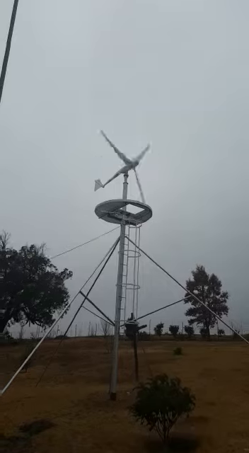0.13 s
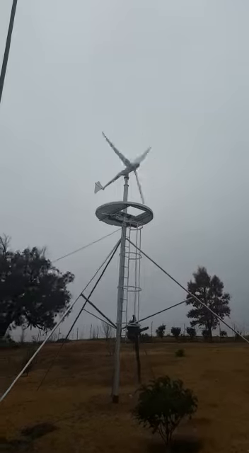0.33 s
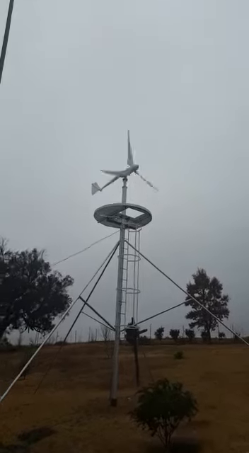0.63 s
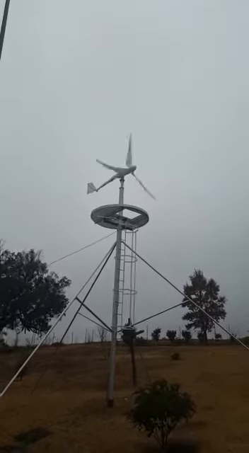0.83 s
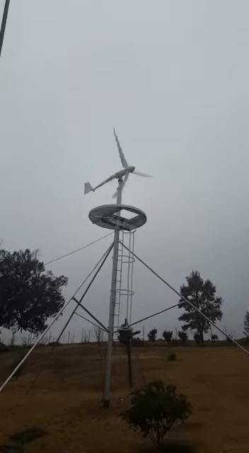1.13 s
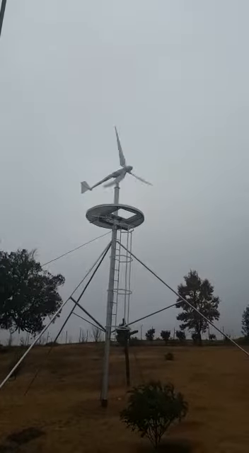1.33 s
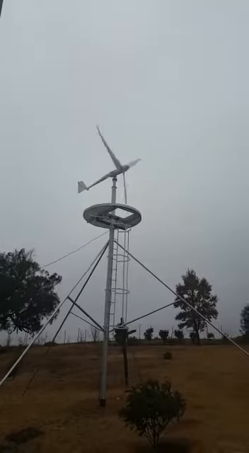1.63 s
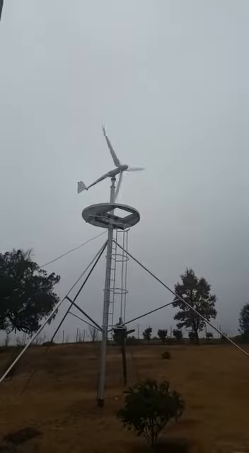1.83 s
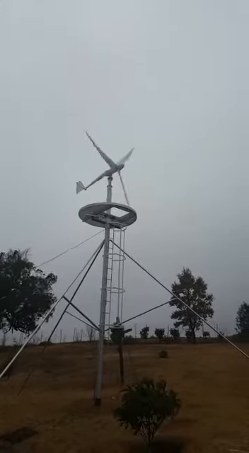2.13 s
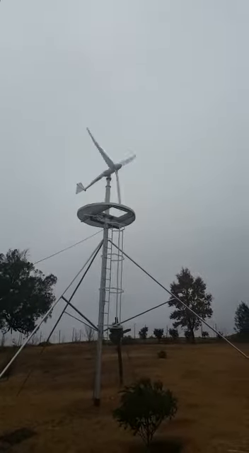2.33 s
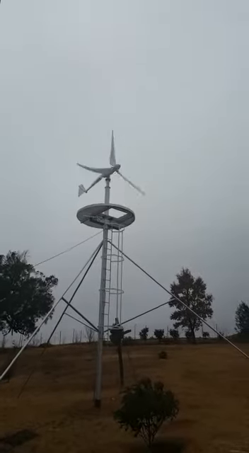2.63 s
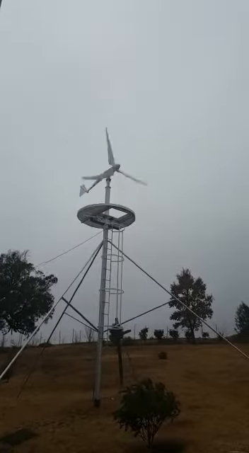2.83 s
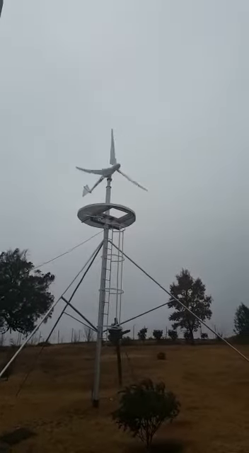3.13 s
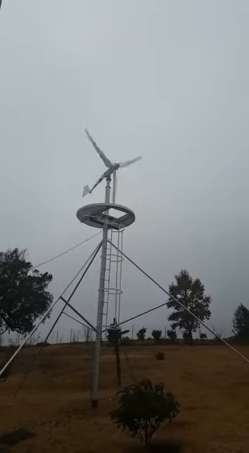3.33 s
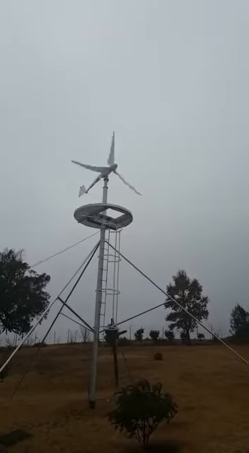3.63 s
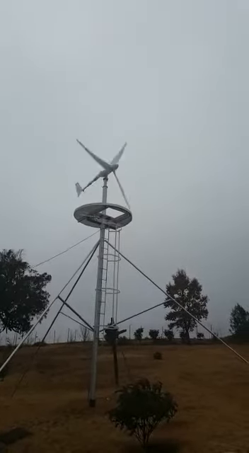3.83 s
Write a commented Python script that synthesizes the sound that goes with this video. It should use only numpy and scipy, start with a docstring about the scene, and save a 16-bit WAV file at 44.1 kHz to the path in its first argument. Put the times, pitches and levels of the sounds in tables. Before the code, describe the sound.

A small wind turbine whirs with rapid whistling pulses beneath heavy, buffeting wind on the microphone

```python
"""A small three-bladed wind turbine spins about eight times a second in strong wind, then slows a little.
Its whistles (vortex shedding) and swishes (broadband hiss) rise in pitch and level on each approach.
Distant trees rush softly; both these sounds are made uneven by turbulent air.
Gusts, modelled as modulated noise, buffet the two microphone ports separately, with dull thumps.
The hardest gusts crackle, mostly on the left."""
import sys
import numpy as np
from scipy import signal
from scipy.fft import rfft, irfft, next_fast_len
from scipy.io import wavfile
from scipy.ndimage import uniform_filter1d, minimum_filter1d, map_coordinates

SR = 44100
rng = np.random.default_rng(int(sys.argv[2]) if len(sys.argv) > 2 else 0)


def bounce(signal):
    """Save signal as a 16-bit WAV file at the path given by the first command-line argument."""
    frames = np.transpose(np.atleast_2d(signal))
    limited = np.clip(frames, -1, 1)
    pcm = np.round(limited * 32767).astype(np.int16)
    wavfile.write(sys.argv[1], SR, pcm)


N = 176400  # samples

# In every table, levels are relative and a positive left-right value favours the left.
# Rotor speed: t/s, speed/(turns per second)
ROTOR_SPEED = [(0, 8.3), (.7, 8.33), (1.0, 8.58), (1.35, 8.42), (1.7, 8.55), (2.25, 8.64), (2.7, 8.35),
               (3.1, 7.85), (3.5, 7.35), (4, 7.0)]
# Rotor loudness: t/s, low whistle level/dB, high whistle level/dB, swish level/dB
ROTOR_LEVEL = [(.36, -62, -74, -87), (.48, -51, -57, -59), (.68, -34, -58, -43.5), (1.0, -45.5, -60, -52),
               (1.35, -39, -54, -55.5), (1.9, -41, -53.5, -52.5), (2.35, -36, -48, -53.5),
               (2.7, -35, -57.5, -51.5), (3.0, -42.5, -60, -59.5), (3.35, -43.5, -65, -59.5),
               (4, -43.5, -68, -53)]
# Low whistles: place round the rotor/(blade spacings), centre f/Hz, level/dB
LOW_WHISTLES = [(0, 4430, -2), (1, 4430, 0)]
# High whistles: place round the rotor/(blade spacings), centre f/Hz, level/dB
HIGH_WHISTLES = [(0.29, 7250, 7), (2.2, 9000, 2.5), (1.6, 8600, -19)]
# Swishes: place round the rotor/(blade spacings), centre f/Hz, half width/octave, level/dB
SWISHES = [(0, 6800, 0.5, 1.5), (1, 7790, 0.35, 0), (2, 8720, 0.31, -0.5)]
# Loudness of wind in the trees: t/s, level/dB
TREES_LEVEL = [(.36, -60), (.55, -39), (1.3, -41.5), (2.5, -34.5), (3.3, -42), (4, -40)]
# Spectrum of wind in the trees: f/Hz, level/dB
TREES_SPECTRUM = [(100, 11), (600, -7), (1500, -3), (3000, -11), (4200, -7.5), (5600, -12.5), (7500, -18),
                  (10000, -25.5), (15000, -30)]
# Wind on the ports: t/s, rumble level/dB, middle level/dB, treble level/dB, left-right level/dB
WIND = [(0.36, -54, -71, -97, 9.0), (0.38, -48.5, -52, -55, 7), (0.46, -26.5, -29, -52, -1.0),
        (0.58, -25.5, -28, -47, -1), (0.62, -21.5, -24.5, -43.5, -1), (0.7, -23.5, -27.5, -44, -1.5),
        (0.72, -18, -23.5, -38, -5), (0.9, -22, -17.5, -18.5, 13.5), (0.92, -23, -28.5, -36.5, 0),
        (0.96, -15.5, -8, -15, 4), (0.99, -20, -28, -32, -6), (1.02, -16.5, -12, -17, -5.5),
        (1.08, -24.5, -27, -29.5, 15), (1.1, -18.5, -17, -22.5, -6.5), (1.17, -21, -19, -20, 5),
        (1.28, -24.5, -27.5, -47, -5), (1.32, -21.5, -19.5, -30.5, -3), (1.34, -31.5, -36, -44, -6),
        (1.45, -23, -26, -37.5, 3.5), (1.51, -28.5, -32, -35, 17), (1.57, -24, -18.5, -29, 3),
        (1.62, -23, -30.5, -38.5, 5.5), (1.72, -22.5, -19.5, -36.5, -3.5), (1.83, -27, -28, -30.5, 12),
        (1.87, -38, -41, -53, 3), (1.94, -22.5, -39, -43, 0), (1.96, -43, -46.5, -51, 1.0),
        (1.99, -33, -30.5, -36, 11.0), (2.03, -33, -36.5, -41, 1), (2.06, -20.5, -25, -34.5, -1),
        (2.08, -21.5, -24, -42, -3), (2.13, -18.5, -12.5, -26, 5.5), (2.23, -23, -24, -31, 6),
        (2.28, -20, -20.5, -60, 4), (2.3, -22, -23, -37.5, 1.5), (2.49, -22.5, -26, -43.5, 4),
        (2.52, -24, -23, -25, 23), (2.55, -26, -29.5, -46.5, 0), (2.65, -21.5, -26.5, -34, 2),
        (2.71, -23.5, -28, -36, 7), (2.74, -20, -15.5, -23.5, 13.5), (2.87, -20.5, -15.5, -19.5, 2.5),
        (2.89, -24.5, -25, -42, -5), (2.93, -24.5, -26.5, -29, 15), (2.99, -19.5, -18, -31, 6),
        (3.01, -36, -36.5, -36.5, 19), (3.08, -26, -18, -19, 2), (3.12, -24.5, -22.5, -42, -5),
        (3.21, -42.5, -40.5, -54, -2), (3.38, -28, -37.5, -67, 3), (3.4, -38.5, -45.5, -55, -8),
        (3.54, -27.5, -32, -40.5, 4.5), (3.62, -31, -33.5, -37.5, 3.5), (3.68, -21, -21, -43.5, 3),
        (3.75, -17.5, -22.5, -36, 4.5), (3.8, -27, -27, -23, 7), (3.82, -16, -15, -21.5, 3),
        (3.87, -23.5, -22, -37, 9), (3.89, -19, -16.5, -27.5, -2), (4.0, -23, -19, -28, 3)]
# Spectrum of the low wind layer: f/Hz, level/dB
RUMBLE_SPECTRUM = [(15, -28), (28, -35), (50, -7.5), (80, -4), (140, 0), (260, -1.5), (370, -4.5),
                   (600, -16.5), (1500, -70)]
# Spectrum of the middle wind layer: f/Hz, level/dB
ROAR_SPECTRUM = [(150, -25), (280, -13), (380, -3), (500, 1), (750, -5.5), (1000, -12), (1500, -27.5),
                 (3000, -66)]
# Spectrum of the treble wind layer: f/Hz, level/dB
RASP_SPECTRUM = [(500, -53), (850, 5), (1100, 3.5), (1600, -2), (2400, -9.5), (3500, -21), (5500, -33.5),
                 (9000, -52), (15500, -76)]
# Single eddies that thump the microphone: t/s, level/dB, left-right level/dB
THUMPS = [(0.662, -5.5, 6), (0.716, -7, 2), (0.79, -8, 7), (0.954, -6, -1.5), (0.992, -3, 2),
          (1.017, 3, -7), (1.367, -7.5, 1), (1.559, -6, 5), (1.931, -9.5, 3), (2.055, -10, 1),
          (2.559, -9.5, -4), (2.632, -5.5, 2), (2.725, -9, 1), (3.059, -2, 2.5), (3.163, -8, 1.0),
          (3.251, -12, 1.0), (3.354, -19.5, -2), (3.669, -10, 2), (3.811, -3, 4)]
# Spectrum of a thump: f/Hz, level/dB
THUMP_SPECTRUM = [(40, -6), (130, 2.5), (500, 5.5), (1000, -9.5), (2000, -24.5), (4000, -49.5),
                  (12000, -61)]
# Crackles in the hardest gusts: t/s, level/dB, half-length to 1/e of the peak/s, left-right level/dB
CRACKLES = [(.815, -19.5, 0.0033, 13), (0.883, -35, .008, 8), (.898, -23, 0.0056, 8),
            (1.077, -30, 0.013, 16), (1.117, -21.5, 0.0044, 19), (1.17, -27, .006, 18),
            (1.185, -11.5, 0.003, 37), (1.814, -25.5, 0.0018, 18), (2.727, -36, .003, 7),
            (2.773, -18, 0.0042, 27), (2.782, -16, 0.0026, 23), (2.809, -22, 0.0048, 20),
            (2.841, -15, 0.0022, 28), (2.847, -14.5, 0.0028, 32), (3.024, -28, 0.0035, 12),
            (3.056, -32, 0.0017, 13), (3.076, -33, 0.0026, 16), (3.774, -27.5, 0.0037, 13)]
# Spectrum of a crackle: f/Hz, level/dB
CRACKLE_SPECTRUM = [(300, -5), (1500, 7.5), (3500, -3.5), (5500, -11), (7000, -6), (10000, -18),
                    (15500, -18.5)]

BLADES, FACING_S = 3, .553  # at FACING_S blade 0 approaches fastest
USUAL_SPEED, PITCH_POWER = 8.5, 1.35  # turns per second; exponent of pitch against speed
SKEW = .45  # slow rise and quick fall of the approach
LOW_DOPPLER, HIGH_DOPPLER = .145, .23  # fractional pitch swing, wider near the tip
LOW_BEAM_DB, HIGH_BEAM_DB, SWISH_BEAM_DB = 6.3, 30, 16  # gain of a blade coming straight on
LOW_LEAD_S, HIGH_LEAD_S = .005, .013  # the beams peak before the pitch does
LOW_WIDTH_HZ, HIGH_WIDTH_HZ = 240, 380
BREATHY, BREATHY_PER_SPEED = .2, .3  # broad share; its growth for each turn per second lost
FLUTTER_DB, FLUTTER_PER_S = 3.3, 80  # turbulence breaks the rotor sound up
SCATTERED_DB = -2.5  # whistle that arrives by way of ground and mast
SWISH_SKIRT_DB = -9  # wider hiss beneath each swish
LEFT_LEAD_S = .00014
PATCHY_DB = 2.8  # unevenness from turbulent air
THUMP_DB, THUMP_RISE_S, THUMP_DECAY_S = -5, .002, .012
OPEN_S, OPEN_FADE_S = 0.363, 0.017  # the microphone comes on
CEILING, LIMIT_HOLD_S = 0.89, 0.0045  # limiter
TOP_HZ = 15800  # band limit


def amp(db):
    """Logarithmic level law: decibels to amplitude gain."""
    return 10 ** (np.asarray(db) / 20)


def unit(x):
    """Power normalisation: scale to rms 1."""
    return x / np.sqrt(np.mean(x ** 2) + 1e-20)


def clock():
    """Uniform sampling: time of each sample in seconds."""
    return np.arange(N) / SR


def curves(rows):
    """Linear interpolation: one value per sample for each column after the time."""
    s, *columns = np.transpose(rows)
    return [np.interp(clock(), s, column) for column in columns]


def wobble(rate):
    """Band-limited randomness: a smooth curve through rate random knots a second."""
    return map_coordinates(rng.standard_normal(N // 2), [clock() * rate], mode="mirror")


def filtered(x, response):
    """Linear filtering: multiply the spectrum of x by a response of frequency."""
    m = next_fast_len(N + 8192)
    return irfft(rfft(x, m) * response(np.fft.rfftfreq(m, 1 / SR)), m)[..., :N]


def noise(spectrum):
    """Spectral shaping: coloured noise of rms 1, unrelated left and right."""
    f, db = np.transpose(spectrum)

    def colour(hz):
        return amp(np.interp(np.log(hz + 1), np.log(f), db))

    return unit(filtered(rng.standard_normal((2, N)), colour))


def panned(pan_db):
    """Intensity stereo: left and right gains of constant power."""
    gains = amp(np.array([pan_db, -pan_db]) / 2).reshape(2, -1)
    return gains / np.sqrt(np.mean(gains ** 2, axis=0))


def approach(speed, blade):
    """Circular motion: how fast a blade nears the listener, from -1 to 1."""
    turns = np.cumsum(speed) / SR
    facing_turns = np.interp(FACING_S, clock(), turns)
    angle = 2 * np.pi * (turns - facing_turns - blade / BLADES)
    return np.cos(angle + SKEW * (1 - np.cos(angle)))


def band(centre_hz, width_hz):
    """Quadrature modulation: a band of noise around a moving centre."""
    phase = 2 * np.pi * np.cumsum(centre_hz) / SR
    return wobble(width_hz) * np.cos(phase) + wobble(width_hz) * np.sin(phase)


def whistle(speed, blade, centre_hz, width_hz, doppler, beam_db, lead_s):
    """Vortex shedding: a fuzzy tone, Doppler shifted, beamed forwards and breathier when slow."""
    near = approach(speed, blade)
    pitch = centre_hz * (speed / USUAL_SPEED) ** PITCH_POWER
    pitch = pitch * (1 + doppler * near) * (1 + .02 * wobble(40))
    broad = BREATHY + BREATHY_PER_SPEED * np.maximum(USUAL_SPEED - speed, 0)

    def fuzz():
        return (band(pitch, width_hz) + broad * band(pitch, 4 * width_hz)) / np.hypot(1, broad)

    early_near = np.interp(clock() + lead_s, clock(), near)
    beam = amp(beam_db * early_near + FLUTTER_DB * wobble(FLUTTER_PER_S))
    direct = fuzz()  # alike in both ports
    scattered = amp(SCATTERED_DB) * np.array([fuzz(), fuzz()])
    return unit((direct + scattered) * beam)


def whistles(rows, speed, *settings):
    """Superposition: one group of whistles summed at rms 1."""
    return unit(sum(amp(db) * whistle(speed, blade, hz, *settings) for blade, hz, db in rows))


def swish(speed, blade, centre_hz, octaves):
    """Broadband tip noise: hiss that sweeps upwards once a turn, never twice alike."""
    near = approach(speed, blade)
    centre = centre_hz * (speed / USUAL_SPEED) ** PITCH_POWER * (1 + HIGH_DOPPLER * near)
    width = centre_hz * (2 ** octaves - 2 ** -octaves)

    def hiss():
        return band(centre, width) + amp(SWISH_SKIRT_DB) * band(centre, 2 * width)

    beam = amp(SWISH_BEAM_DB * near + FLUTTER_DB * wobble(FLUTTER_PER_S))
    return unit(np.array([hiss(), hiss()]) * beam)


def turbine():
    """Rotating sources: whistles, which reach the left port first by a phase lead, and swishes."""
    speed, = curves(ROTOR_SPEED)
    low_db, high_db, swish_db = curves(ROTOR_LEVEL)
    low = whistles(LOW_WHISTLES, speed, LOW_WIDTH_HZ, LOW_DOPPLER, LOW_BEAM_DB, LOW_LEAD_S)
    high = whistles(HIGH_WHISTLES, speed, HIGH_WIDTH_HZ, HIGH_DOPPLER, HIGH_BEAM_DB, HIGH_LEAD_S)
    tones = amp(low_db) * low * panned(pan_db=-1) + amp(high_db) * high * panned(pan_db=5)

    def left_first(hz):  # half the lead forwards on the left, half back on the right
        return np.exp(1j * np.pi * hz * LEFT_LEAD_S * np.array([[1], [-1]]))

    ports = filtered(tones, left_first)
    hiss = unit(sum(amp(db) * swish(speed, blade, hz, octaves) for blade, hz, octaves, db in SWISHES))
    return ports + amp(swish_db) * hiss * panned(pan_db=3.5)


def trees():
    """Incoherent summation: the soft, wide rush of distant foliage as coloured noise."""
    level_db, = curves(TREES_LEVEL)
    return amp(level_db + 0.5 * wobble(3.44)) * noise(TREES_SPECTRUM)


def patchy(x):
    """Propagation through turbulence: random patches of gain over frequency and time."""
    z = signal.stft(x, nperseg=512)[2]
    field = rng.standard_normal(z.shape[1:])  # shared by both ports
    field = uniform_filter1d(uniform_filter1d(field, size=5, axis=0), size=5, axis=1)
    return signal.istft(z * amp(PATCHY_DB * unit(field)), nperseg=512)[1][:, :N]


def buffeting():
    """Turbulent pressure: eddies strike each port in lumps; brighter layers spit more sharply."""
    rumble_db, roar_db, rasp_db, pan_db = curves(WIND)
    eddies = np.array([wobble(85), wobble(85)])
    spits = np.array([wobble(320), wobble(320)])

    def layer(spectrum, eddy_db, spit_db):
        return unit(noise(spectrum) * amp(eddy_db * np.tanh(eddies) + spit_db * spits))

    rumble = layer(RUMBLE_SPECTRUM, eddy_db=2.5, spit_db=0.4) * panned(0.42 * pan_db - .3)
    roar = layer(ROAR_SPECTRUM, eddy_db=6.5, spit_db=2.33) * panned(0.99 * pan_db - .7)
    rasp = layer(RASP_SPECTRUM, eddy_db=8.5, spit_db=4.5) * panned(0.98 * pan_db + 1.5)
    return amp(rumble_db + 3.5) * rumble + amp(roar_db + 4.0) * roar + amp(rasp_db + 4.0) * rasp


def thumps():
    """Impulsive excitation: single eddies, each a sudden dull puff with exponential decay."""
    puffs = 0
    for s, db, pan_db in THUMPS:
        age = np.maximum(clock() - s, 0)
        envelope = (1 - np.exp(-age / THUMP_RISE_S)) * np.exp(-age / THUMP_DECAY_S)
        puffs = puffs + amp(db) * envelope * panned(pan_db)
    return amp(THUMP_DB) * puffs * noise(THUMP_SPECTRUM)


def crackles():
    """Overload: brief ragged bursts of noise where a gust overdrives a port."""
    bursts = 0
    for s, db, length, pan_db in CRACKLES:
        envelope = np.exp(-np.minimum(((clock() - s) / length) ** 2, 50))
        bursts = bursts + amp(db) * envelope * panned(pan_db)
    return bursts * unit(noise(CRACKLE_SPECTRUM) * amp(4.9 * wobble(1200)))


def scene():
    """Superposition: turbine and trees through turbulent air, behind the wind on the microphone."""
    distant = amp(-0.06) * patchy(turbine() + trees())
    return distant + buffeting() + thumps() + crackles()


def record(dry):
    """Gain control and band limiting: fade in from silence, limit the peaks, cut the highest treble."""
    x = dry * np.clip((clock() - OPEN_S) / OPEN_FADE_S, 0, 1) ** 2
    hold = int(LIMIT_HOLD_S * SR) + 1
    needed = np.minimum(1, CEILING / (np.abs(x) + 1e-9))
    gain = uniform_filter1d(minimum_filter1d(needed, 2 * hold), hold)
    return filtered(x * gain, lambda hz: np.clip((TOP_HZ - hz) / 200, 0, 1))


dry = scene()
out = record(dry)
bounce(out)
```